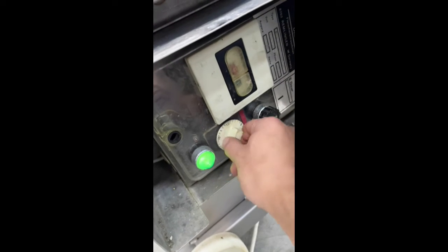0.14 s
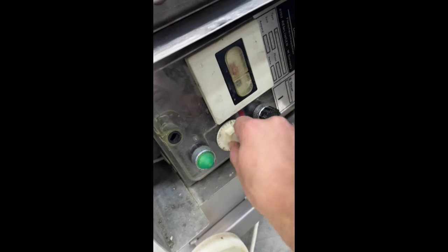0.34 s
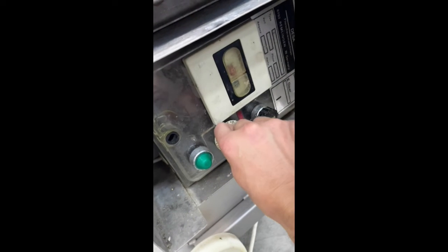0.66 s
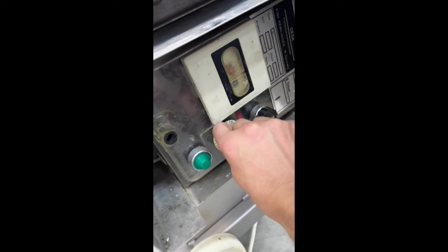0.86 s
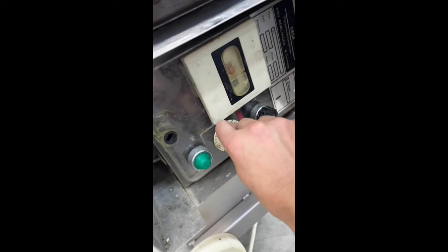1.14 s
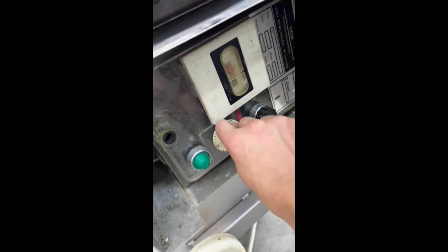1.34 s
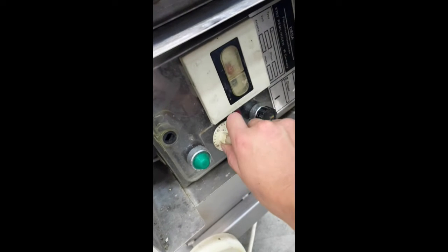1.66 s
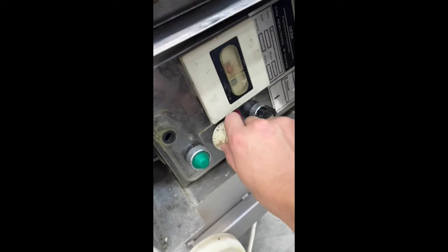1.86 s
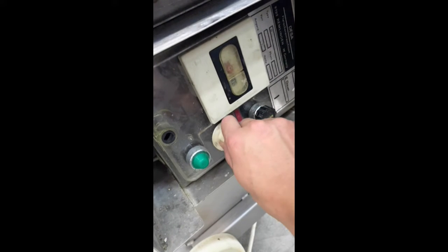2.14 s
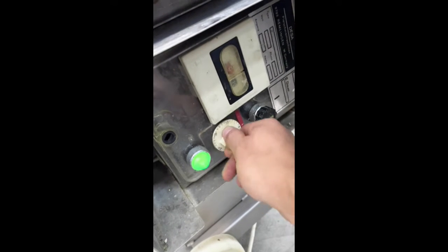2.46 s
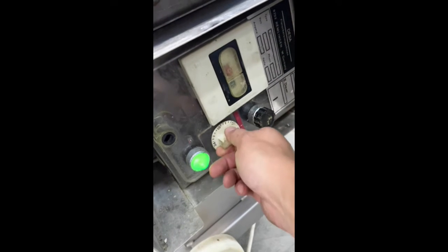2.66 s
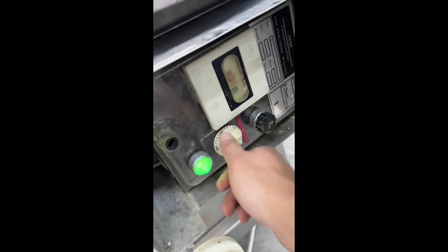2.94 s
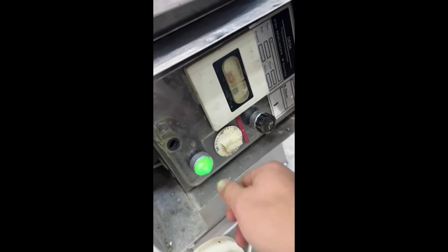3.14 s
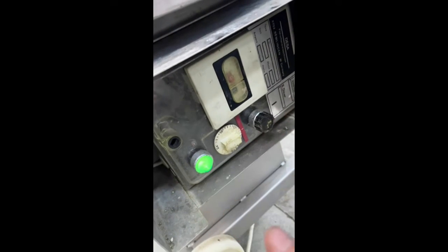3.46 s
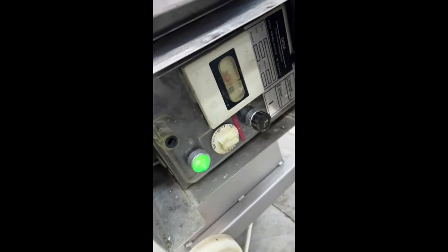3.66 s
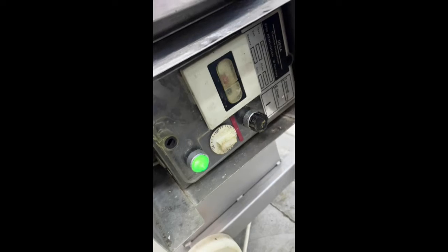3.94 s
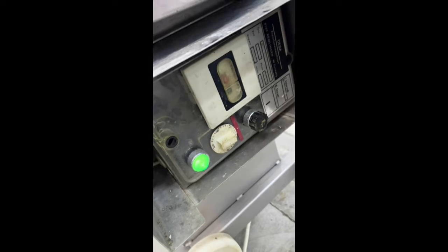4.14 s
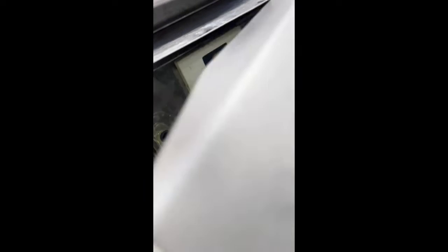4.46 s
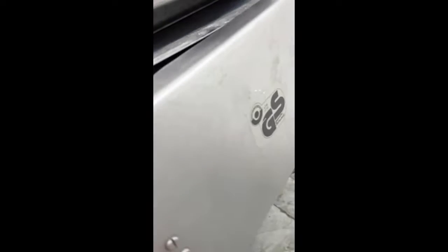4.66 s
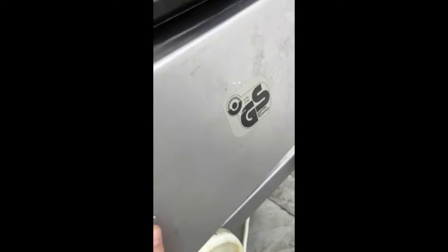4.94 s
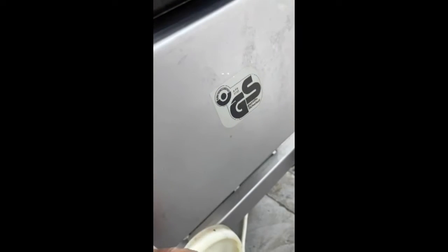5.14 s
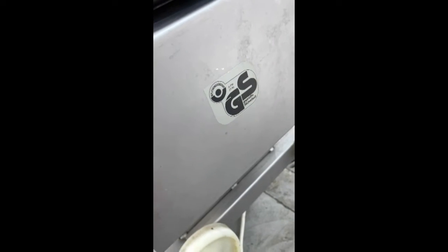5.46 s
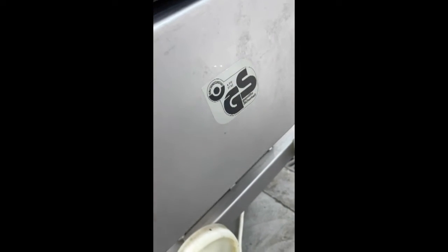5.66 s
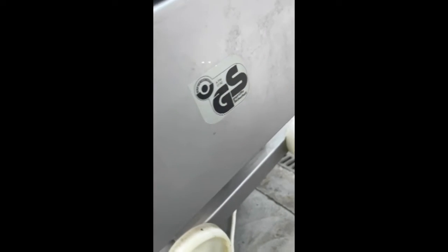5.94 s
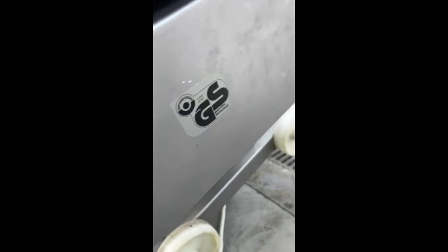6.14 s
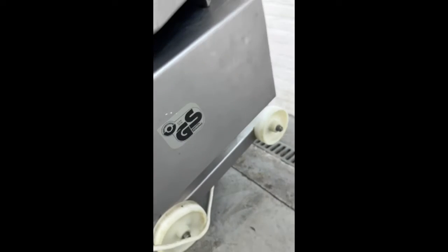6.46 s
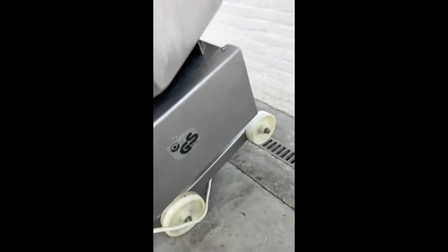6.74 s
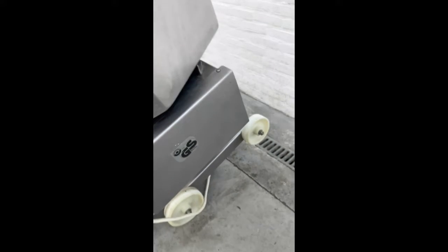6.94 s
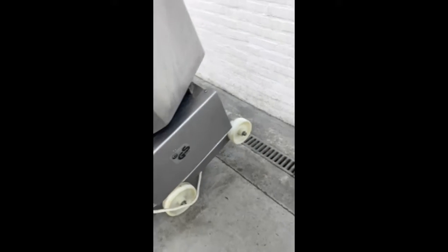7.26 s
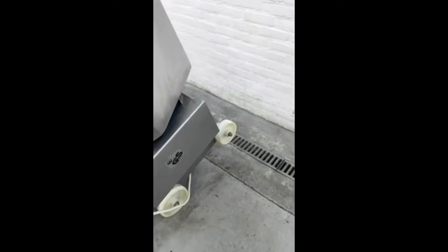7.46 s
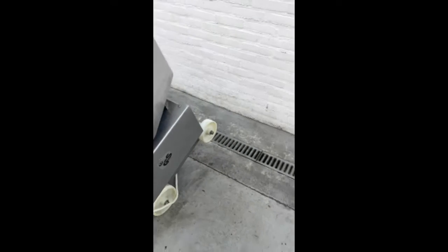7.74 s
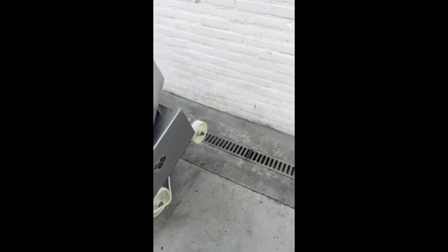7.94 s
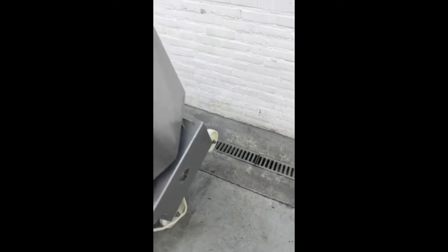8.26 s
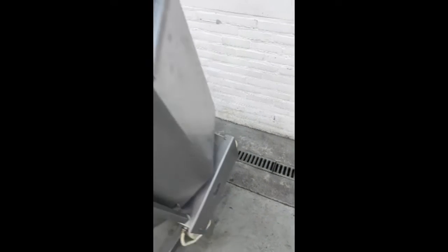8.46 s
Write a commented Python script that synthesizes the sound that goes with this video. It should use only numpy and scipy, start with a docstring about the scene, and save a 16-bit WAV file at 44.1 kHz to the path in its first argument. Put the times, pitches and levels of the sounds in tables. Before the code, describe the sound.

An electric mixer motor hums close by inside a steel casing, with a low rumble, light rattle, airy whirr and thin high whistles. At about 0.4 seconds a timer knob trips a sharp switch clack, and the motor runs down by 1.3 seconds, leaving only the faint distant ventilation of a large hall. A small click comes at 2.2 seconds, then a loud clack at 2.4 restarts the motor instantly with a low surge, its whistles sinking slightly in pitch. Lighter clicks follow at 2.5 and 2.9 seconds. Around 3.4 seconds a hand slides off the panel with a soft hiss and a tiny tap. The sheet steel cover knocks lightly at 4.7 seconds, then shuts with hollow raps at 5.1 and, loudest, 5.2, ringing faintly. The hum shifts in tone as the microphone moves round the machine, growing quieter from 7 seconds until the end near 8.6.

```python
"""Mixer motor stopping and restarting

A mixer motor hums inside a sheet steel casing, runs down when the timer knob trips its contactor
and starts again. Rotor and gears shake the modes of frame and casing under a whirr and thin whistles.
A hand slides off the panel and raps the casing. The microphone then moves round the machine,
which shifts the modes heard, in a large hall filled with distant ventilation."""
import sys
import numpy as np
from scipy import signal
from scipy.fft import rfft, irfft, next_fast_len
from scipy.io import wavfile
from scipy.ndimage import uniform_filter1d, map_coordinates

SR = 44100
rng = np.random.default_rng(int(sys.argv[2]) if len(sys.argv) > 2 else 0)


def generate_wav(signal):
    """Clip the signal to [-1, 1] and save it as 16-bit WAV at the path in sys.argv[1]."""
    frames = np.transpose(np.atleast_2d(signal))
    scaled = np.clip(frames, -1, 1) * 32767
    pcm = np.round(scaled).astype(np.int16)
    wavfile.write(sys.argv[1], SR, pcm)


N = 379260
TIME_S = np.arange(N) / SR

FIRST_START_S, STOP_S, RESTART_S = -1.6, 0.41, 2.435
COAST_S, SPIN_UP_S = 0.89, 0.0316
SURGE_DB, SURGE_S = 6, 0.42  # frame lurch at start
UNPOWERED_DB = -4.5  # whirr and whistles, below full speed
# (frequency [Hz], width [Hz], gain at panel [dB], at corner [dB], at flank [dB])
CASING_MODES = [(201.9, 22.6, -16, -9.5, -8.5), (308, 91, -12.5, -16, -9.5), (356.4, 21.2, -4, -1, 4.5),
                (375.9, 36.7, -1, -6.5, -2.5), (479.5, 32, -6.5, -8.5, -4.5), (533, 41.5, -2.5, -4, -0.5),
                (599, 59, -4.5, -7, 0.5), (656, 38, -16, -8.5, -1.5), (805, 15.9, -9.5, -6, 5.5),
                (823.2, 25, -28, -19.5, -1.5), (847, 27.4, -0.5, -5, 0.5), (909, 65, -1, -13, -8),
                (1006, 29, -11.5, -10, -13.5), (1107.7, 29, -14, -7.5, -4), (1224.5, 87, -6.5, -12.5, -9.5),
                (1267.5, 26, -18.5, -2.5, -13), (1361, 79, -24.5, -4.5, -19.5),
                (1418.7, 88, -7.5, -9.5, -10), (1519, 55, -5.5, -11.5, -13), (1680, 47, -19, -11, -14.5),
                (1837, 72, -9, -18.5, -14.5), (1908, 45, -29, -31, -16.5), (1917, 56, -6.5, -10.5, -22.5),
                (2027, 48, -20, -18, -12), (2063, 104, -13.5, -15, -38), (2142, 234, -18.5, -16, -17),
                (2383, 46, -18, -17, -21.5), (2500, 870, -30, -25.5, -32.5)]
BEARING_MODES = [(4493, 67, -4, -4, -12.5), (4810, 81, -10, -6, -11.5), (5220, 140, -15, -19, -25),
                 (5980, 190, -8, -22, -29)]
# (frequency [Hz], width [Hz], gain [dB])
FRAME_MODES = [(60, 11.8, 0.5), (96, 12.9, 1.5), (134.7, 49, -2.5), (179.4, 4.8, -5.5)]
# (frequency [Hz], density [dB])
FAN_SPECTRUM = [(1800, -50), (2500, 6.5), (3200, -4.5), (4200, -1.5), (6000, -2.5), (8000, -10),
                (10000, -15), (12000, -22.5), (16000, -45)]
# (time [s], place [0 panel, 1 corner, 2 flank, 3 behind])
MIC_PATH = [(0, 0.56), (2.6, 0.28), (3.0, 0.19), (3.4, 0.55), (4.4, 0.65), (4.7, 1.05), (5.15, 1.48),
            (5.65, 1.21), (6.2, 1.77), (6.75, 1.65), (7.6, 2.15), (8.6, 2.57)]
# Levels before speed scaling; they dip after the switch clack and swell back.
# (time [s], hum [dB], rumble [dB], rattle [dB])
MOTOR_LEVELS = [(0, -21, -29.5, -34.5), (.36, -23, -37.5, -33), (.5, -28, -35, -40), (.6, -24, -34.5, -31),
                (2.5, -26, -34.5, -36), (2.83, -25.5, -34.5, -33), (3.23, -27, -39, -33.5),
                (3.62, -23.5, -33.5, -33), (4.15, -24, -35, -34.5), (4.86, -25.5, -36.5, -38),
                (5.3, -29, -30.5, -36.5), (5.72, -28.5, -31, -38), (6.13, -30, -30.5, -36.5),
                (6.61, -27.5, -33, -39), (7.02, -30, -38.5, -39.5), (7.23, -36, -42, -39.5),
                (7.5, -37, -37, -40), (7.91, -37, -39.5, -41), (8.26, -37.5, -35.5, -39.5),
                (8.6, -39, -37, -38.5)]
# Fade with distance: (time [s], level [dB])
WHIRR_LEVELS = [(0, -48), (4.1, -47.5), (4.9, -49.5), (6, -51), (8.6, -53.5)]

def motor():
    """Rotor and gears shake frame and casing; each layer follows a power of the shaft speed."""
    speed, running_s = shaft()
    place = curves(MIC_PATH)[0]
    hum_db, rumble_db, rattle_db = curves(MOTOR_LEVELS)
    rumble_db += SURGE_DB * np.exp(-running_s / SURGE_S)
    whirr_db = curves(WHIRR_LEVELS)[0] + UNPOWERED_DB * (speed < 1)
    gears = shaking(rough_db=1.0, rate_hz=70) * amp(0.33 * wobble(11))
    casing = ringing(gears, CASING_MODES, place, swell_db=0.8)
    hum = lowpass(casing, 960, order=20)
    rattle = casing - hum
    hum -= (1 - speed ** 0.8) * lowpass(hum, 620, order=10)  # deep modes die first when coasting
    frame = lambda hz: modes(FRAME_MODES)(hz) / (1 + (45 / (hz + 1)) ** 6) / (1 + (hz / 250) ** 4)
    rumble = filtered(shaking(rough_db=0.5, rate_hz=10), frame)
    fan = coloured(shaking(rough_db=0.7, rate_hz=40), FAN_SPECTRUM)
    bearing = ringing(shaking(rough_db=1.1, rate_hz=30), BEARING_MODES, place, swell_db=1.2)
    body = (amp(hum_db) * speed ** 1.62 * unit(hum)
            + amp(rumble_db) * speed ** 2.1 * unit(rumble)
            + amp(rattle_db) * speed ** 2.75 * unit(rattle)
            + amp(whirr_db) * speed ** 2.1 * (fan + 0.4 * bearing))
    via_hall = np.clip(place / 2, 0, 1)
    near, far = stereo(body, lean=1.8, wide_db=5.5), stereo(body, lean=0.28, wide_db=5.0)
    return (1 - via_hall) * near + via_hall * far


def shaft():
    """Speed (0-1) and seconds since the last start; friction brakes the rotor evenly."""
    restarted = TIME_S >= RESTART_S
    running_s = TIME_S - np.where(restarted, RESTART_S, FIRST_START_S)
    speed = np.where(restarted, running_s / SPIN_UP_S, 1 - (TIME_S - STOP_S) / COAST_S)
    return np.clip(speed, 0, 1), running_s


def ringing(drive, table, place, swell_db):
    """Sharp driven modes, each weighted by place and swelling in its own time."""
    size = next_fast_len(N)
    looped = np.pad(drive, ((0, 0), (0, size - N)), "wrap")  # already ringing at time zero
    spectrum, freqs = rfft(looped), np.fft.rfftfreq(size, 1 / SR)
    out = 0
    for hz, width, panel, corner, flank in table:
        db = np.interp(place, [0, 1, 2, 3], [panel, corner, flank, 2 * flank - corner])
        mode = irfft(spectrum * modes([(hz, width, 0)])(freqs) ** 2, size)[:, :N]
        out += amp(db + swell_db * wobble(2.411)) * mode
    return unit(out)


# (time [s], level [dB], thud [dB], snap [dB], ring centre [Hz], thud centre [Hz], t60 [s])
SWITCH_BLOWS = [(0.3555, -12, -33, -9.5, 2630, 395, 0.023), (0.358, -9, -1.5, -4.5, 920, 690, 0.031),
                (0.367, -3, -3, -15, 1440, 352, 0.035), (0.375, -13, 8.5, -17, 1190, 266, 0.041),
                (2.171, -26, 0, -17.5, 1480, 300, 0.047), (2.406, -29, -1, -46, 1260, 417, 0.36),
                (2.427, -2, -6, -8.5, 2140, 395, 0.047), (2.437, -6.5, 2, -29, 1040, 342, 0.053),
                (2.499, -17.5, -2, -20, 907, 514, 0.044), (2.882, -16, -0.5, -20, 880, 527, 0.071)]
# (frequency [Hz], width [Hz], gain [dB])
CONTACTOR_MODES = [(836, 97, 7), (1030, 78, 6.5), (1213, 59, 6), (1727, 170, 2), (2207, 100, 9.5),
                   (2443, 50, -2), (2780, 130, 1.5), (3400, 1700, -7), (4200, 89, 2), (5650, 230, 0)]
# (frequency [Hz], gain [dB])
SWITCH_BOX_MODES = [(225, 4.5), (355, 3.5), (480, -1.5), (640, 2.5)]

def switch():
    """Timer knob and contactor clack in the switch box."""
    return blows(SWITCH_BLOWS, CONTACTOR_MODES, SWITCH_BOX_MODES, hold_s=0.0086, push=19.3)


# (time [s], level [dB], thud [dB], snap [dB], ring centre [Hz], thud centre [Hz], t60 [s])
HAND_BLOWS = [(3.497, -37.5, 14, 10, 2360, 500, 0.27), (4.724, -28, -3, -4, 1480, 505, 0.069),
              (5.119, -17.5, 6, -1, 1540, 350, 0.068), (5.136, -29.5, 22, -22, 900, 150, 0.14),
              (5.224, -6.5, 1, -1, 1980, 191, 0.13), (5.25, -16.5, 13, -18, 910, 563, 0.04)]
# (frequency [Hz], width [Hz], gain [dB])
SHEET_MODES = [(1020, 264, 11.5), (1330, 260, 10.5), (2130, 280, 4.5), (3330, 250, 6.5)]
# (frequency [Hz], gain [dB])
CAVITY_MODES = [(95, 6), (140, 2.5), (317, -2), (443, 4.5), (590, -1.5)]
# (frequency [Hz], gain [dB], t60 [s])
SHEET_TONES = [(315, -14.5, 2.6), (580, -11, .25), (2640, -31, .8), (3345, -42, 2.5), (3820, -4, .06),
               (4320, -12, .07), (4930, -19, .15), (5190, -11, .06), (5749, -12.5, .2)]

def raps():
    """A hand raps the hollow casing; the loosely held sheet rings on, wavering."""
    return blows(HAND_BLOWS, SHEET_MODES, CAVITY_MODES, hold_s=0.0049, push=3, tones=SHEET_TONES)


HARD_BLOW_DB = -9  # softer blows excite the tones less
# (frequency [Hz], density [dB])
SNAP_SPECTRUM = [(2500, -33), (4000, -1.5), (11000, -9), (16000, -19.5)]

def blows(events, body, hollow, hold_s, push, tones=()):
    """Each blow pushes once, then chatters into the body's modes, with a snap, a thud and any tones."""
    out, t = np.zeros((2, N + SR)), np.arange(SR) / SR
    wavers = [amp(4 * wobble(45)[:SR]) for _ in tones]
    fade = lambda t60, hold: amp(-60 * np.maximum(t - hold, 0) / t60) * (1 - np.exp(-t / 0.0015))
    # The contact point favours nearby modes.
    favour = lambda hz, centre: 1 / (1 + (np.log((hz + 1) / centre) / 0.5) ** 2)
    for start_s, db, thud_db, snap_db, ring_hz, thud_hz, t60 in events:
        chatter, hiss = rng.standard_normal((2, 2, SR))
        chatter[0, 0] += push
        ring = unit(filtered(chatter, lambda hz: modes(body)(hz) * favour(hz, ring_hz)))
        ring *= fade(t60, hold_s)
        thud = unit(sum(amp(gain + rng.standard_normal()) * favour(hz, thud_hz)
                        * np.sin(2 * np.pi * hz * t + [[0], [np.pi / 2]]) for hz, gain in hollow))
        thud *= fade(0.98 * t60, 0.77 * hold_s) * (1 - np.exp(-t / 0.0023))
        snap = coloured(hiss, SNAP_SPECTRUM)
        snap *= fade(0.84 * t60, 0.47 * hold_s) + 0.13 * fade(3 * t60, 0)
        tail = sum(amp(gain) * waver * fade(tone_t60, 0) * np.sin(2 * np.pi * hz * t)
                   for (hz, gain, tone_t60), waver in zip(tones, wavers))
        blow = ring + amp(thud_db) * thud + amp(snap_db) * snap + amp(0.8 * (db - HARD_BLOW_DB)) * tail
        start = round(start_s * SR)
        out[:, start:start + SR] += amp(db - 7.5) * blow
    return stereo(out[:, :N], lean=2.1, wide_db=7.0)


# (peak time [s], level [dB], 30 dB rise [s], 30 dB fall [s])
HAND_STROKES = [(3.421, -34.5, 0.57, 0.08), (3.62, -48, 0.08, 0.8), (4.84, -55.5, 0.23, 4.5),
                (7.0, -61, 0.17, 1.5)]
# (frequency [Hz], density [dB])
SKIN_SPECTRUM = [(2500, -42), (4500, -16), (6500, 1.5), (10500, -7), (13000, -12), (16000, -19.5)]

def slide():
    """Skin and cloth hiss along the steel in small slips."""
    strokes = sum(amp(db - 30 * np.maximum((peak_s - TIME_S) / rise_s, (TIME_S - peak_s) / fall_s))
                  for peak_s, db, rise_s, fall_s in HAND_STROKES)
    friction = coloured(shaking(rough_db=2.5, rate_hz=39), SKIN_SPECTRUM)
    return stereo(strokes * friction, lean=0.5, wide_db=-24.0)


COAST_SAG = 0.049  # share of pitch lost at standstill
# (settled [Hz], initial [Hz], settling [s], fuzz [Hz], level [dB], fade start [s], fade [dB/s])
MOTOR_WHISTLES = [(9600, 10700, 1, 200, -64, 4.1, 3), (4640, 4830, 0.95, 130, -50.5, 3.0, 16)]

def whistles():
    """Fuzzy whistles sink after each start, sag as the rotor coasts and fade as the microphone moves."""
    speed, running_s = shaft()
    out = 0
    for end_hz, start_hz, settle_s, fuzz_hz, db, fade_s, db_per_s in MOTOR_WHISTLES:
        hz = end_hz + (start_hz - end_hz) * np.exp(-running_s / settle_s)
        hz *= 1 - COAST_SAG * (1 - speed)
        phase = 2 * np.pi * np.cumsum(hz) / SR
        level = amp(db - db_per_s * np.maximum(TIME_S - fade_s, 0))
        fuzz = lowpass(rng.standard_normal((2, N)), fuzz_hz, order=2)
        out += level * unit(fuzz[0] * np.cos(phase) + fuzz[1] * np.sin(phase))
    return speed ** 2.3 * amp(UNPOWERED_DB * (speed < 1) + 1.5 * wobble(12)) * out


# (frequency [Hz], density [dB])
HALL_SPECTRUM = [(30, -13), (50, -3.5), (170, -2.5), (250, -8), (1100, -10), (1700, -14), (2100, -14),
                 (4000, -24), (6000, -27), (8000, -29), (10000, -35), (12000, -39.5), (16000, -40.5)]

def hall():
    """Distant ventilation and machines fill the hall."""
    air = coloured(shaking(rough_db=0.5, rate_hz=37), HALL_SPECTRUM)
    return amp(-45.0) * stereo(air, lean=0, wide_db=8.5)


# (frequency [Hz], side over mid [dB])
STEREO_WIDTH = [(40, -35.5), (120, -54), (200, -27), (380, -19), (700, -15), (1300, -14.5), (2400, -12.5),
                (4100, -7), (4500, -5), (4750, -17), (5500, -11.5), (6400, -9.5), (7000, -33.5)]
# (frequency [Hz], side-mid correlation per unit lean [left +])
STEREO_LEAN = [(200, -0.34), (1300, -0.29), (2000, 0.12), (2900, -0.22), (3600, -0.08), (5000, -0.071)]

def stereo(pair, lean, wide_db):
    """Left and right from a sound and its unrelated twin; lean ties the side to the mid."""
    def response(hz):
        tied = np.clip(lean * along(STEREO_LEAN, hz), -0.95, 0.95)
        return amp(along(STEREO_WIDTH, hz) + wide_db) * [tied, np.sqrt(1 - tied ** 2)]
    side = filtered(pair, response).sum(0)
    return np.array([pair[0] + side, pair[0] - side])


def amp(db):
    return 10 ** (np.asarray(db) / 20)


def unit(x):
    return x / np.sqrt(np.mean(x ** 2) + 1e-20)


def along(points, hz):
    """Interpolate on a log frequency axis."""
    freqs, values = np.transpose(points)
    return np.interp(np.log(hz + 1), np.log(freqs + 1), values)


def curves(rows):
    """One value per sample for each column after the time."""
    times, *columns = np.transpose(rows)
    return [np.interp(TIME_S, times, column) for column in columns]


def wobble(rate_hz):
    """Smooth random curve."""
    knots = rng.standard_normal(int(N * rate_hz / SR) + 4)
    return map_coordinates(knots, [TIME_S * rate_hz])


def shaking(rough_db, rate_hz):
    """Two unrelated noises with shared uneven bumps."""
    return rng.standard_normal((2, N)) * amp(rough_db * wobble(rate_hz))


def filtered(x, response):
    """Apply a complex frequency response."""
    size = next_fast_len(x.shape[-1] + 8192)
    return irfft(rfft(x, size) * response(np.fft.rfftfreq(size, 1 / SR)), size)[..., :x.shape[-1]]


def lowpass(x, cutoff_hz, order):
    return filtered(x, lambda hz: 1 / (1 + (hz / cutoff_hz) ** order))


def coloured(x, spectrum):
    return unit(filtered(x, lambda hz: amp(along(spectrum, hz))))


def modes(table):
    """Causal response of resonances summed with alternating sign."""
    return lambda f: sum((-1) ** k * amp(db) * 1j * f * width / (hz * hz - f * f + 1j * f * width)
                         for k, (hz, width, db) in enumerate(table))


def scene():
    """Machine, hand and hall."""
    knocks = switch() + raps()
    return motor() + whistles() + slide() + knocks + hall()


def ducking(x, threshold_db=-17, db_per_db=3.95, recovery_s=0.54):
    """Gain that sinks after loud moments and recovers slowly."""
    power = np.abs(uniform_filter1d((x ** 2).mean(0), size=441)) + 1e-12
    over_db = np.maximum(10 * np.log10(power) - threshold_db, 0)
    pole = np.exp(-1 / (recovery_s * SR))
    return amp(-db_per_db * signal.lfilter([1 - pole], [1, -pole], over_db))


CEILING, TOP_HZ = 0.97, 15900
# (frequency [Hz], left lead [half turns])
CHANNEL_PHASE = [(4300, 0), (7100, 1), (8200, 1), (10500, 2), (11600, 2), (13700, 3), (14800, 3),
                 (16000, 3.6)]

def record(dry):
    """The channels part in phase in the treble; gain ducks after bangs and peaks saturate softly."""
    turned = filtered(dry, lambda hz: np.exp(0.5j * np.pi * along(CHANNEL_PHASE, hz) * [[1], [-1]]))
    ducked = turned * ducking(turned)
    soft = ducked / (1 + np.abs(ducked / CEILING) ** 4) ** (1 / 4)
    return filtered(soft, lambda hz: hz < TOP_HZ)


dry = scene()
out = record(dry)
generate_wav(out)
```